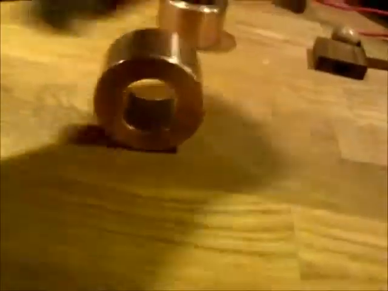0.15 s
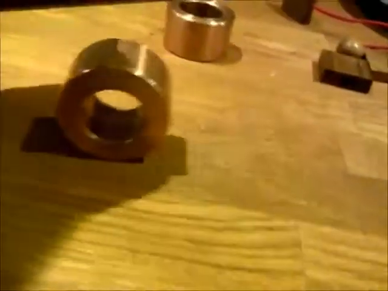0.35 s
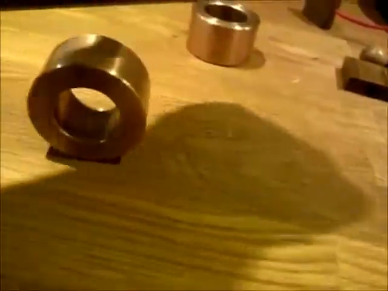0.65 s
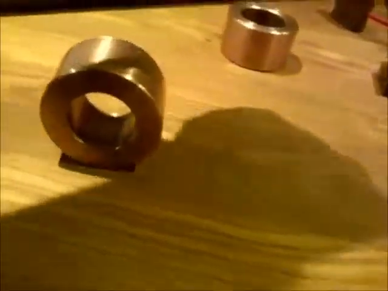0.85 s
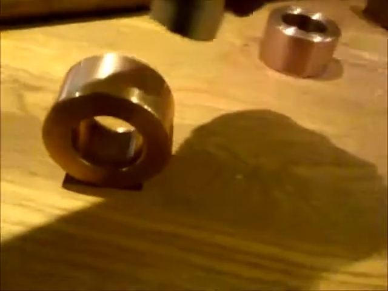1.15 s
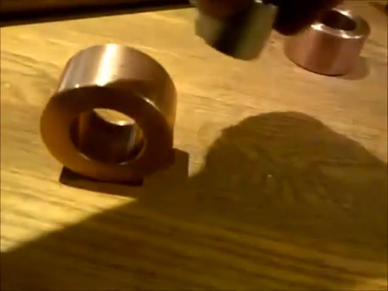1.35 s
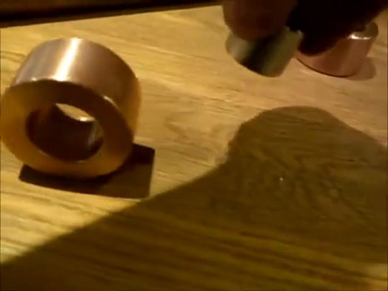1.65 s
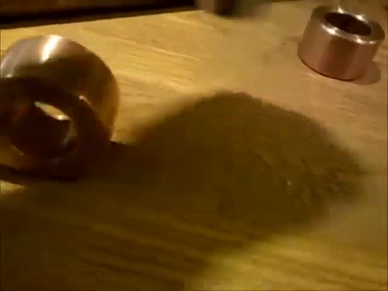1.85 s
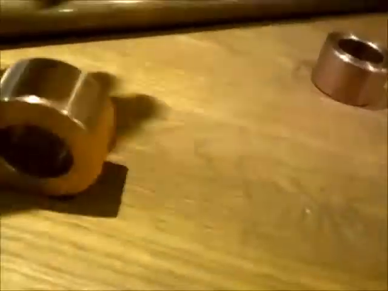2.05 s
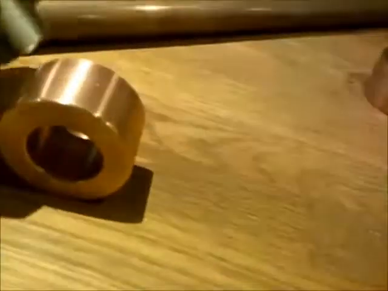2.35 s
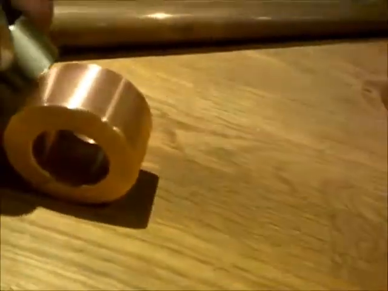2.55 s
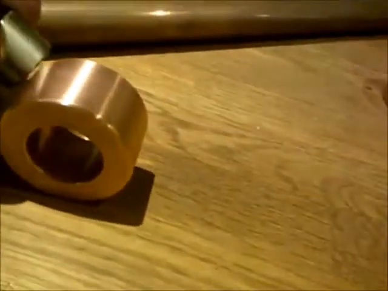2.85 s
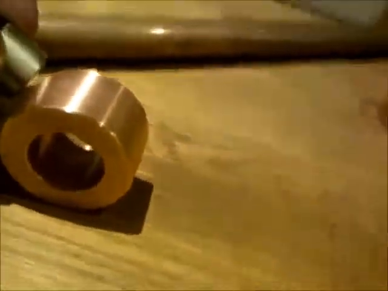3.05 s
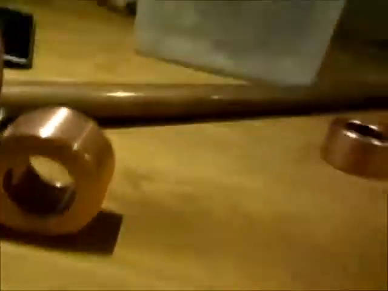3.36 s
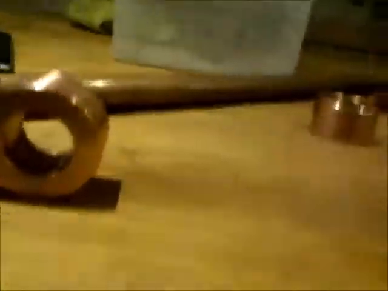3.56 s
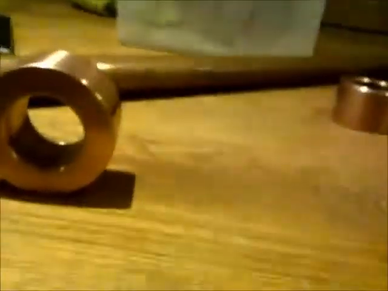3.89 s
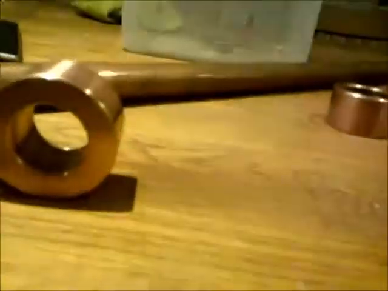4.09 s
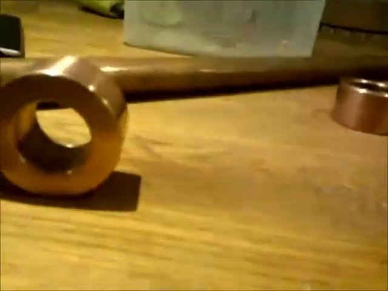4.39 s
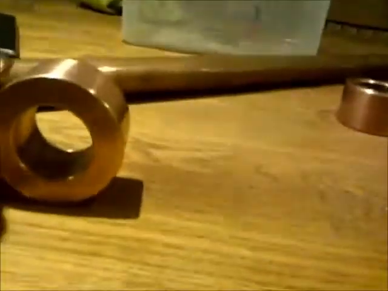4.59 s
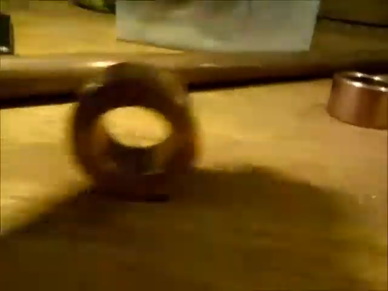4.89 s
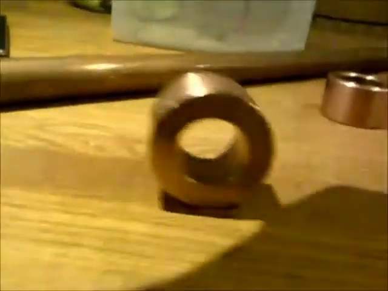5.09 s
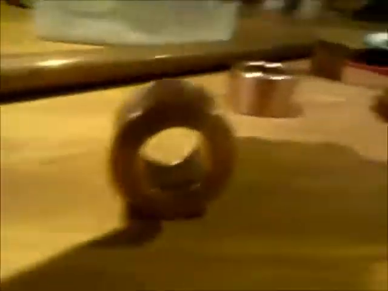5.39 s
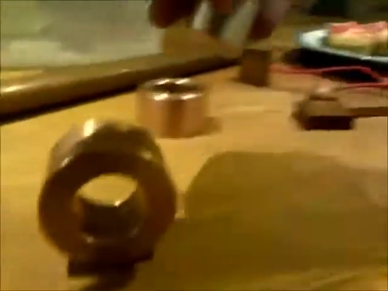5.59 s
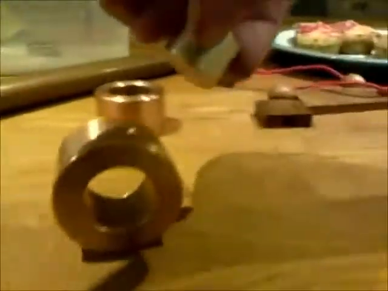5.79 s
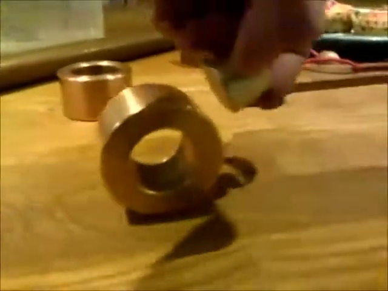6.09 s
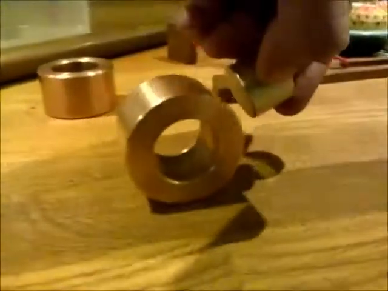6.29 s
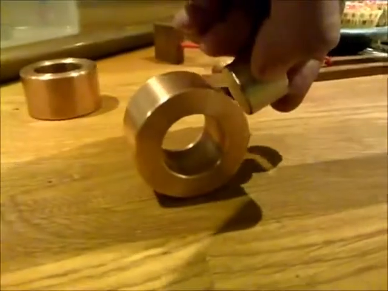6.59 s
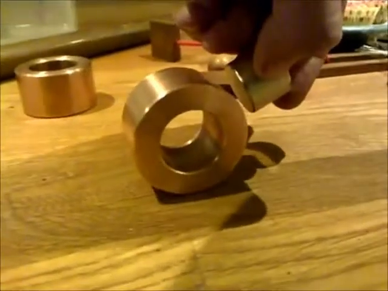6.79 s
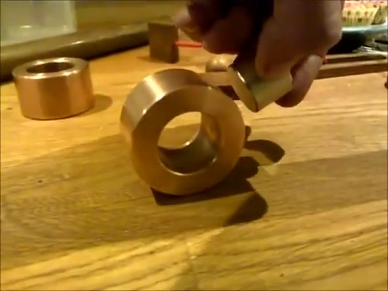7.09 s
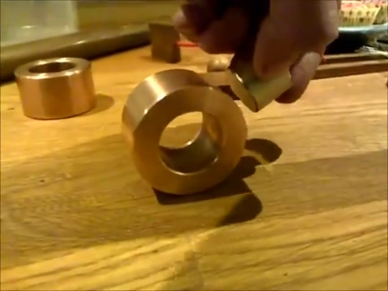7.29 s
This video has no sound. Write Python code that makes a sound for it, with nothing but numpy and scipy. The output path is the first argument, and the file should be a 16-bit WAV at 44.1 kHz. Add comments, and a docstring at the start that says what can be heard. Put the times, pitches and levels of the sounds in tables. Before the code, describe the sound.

A thick copper ring is nudged along a wooden table by a small hand-held magnet, close to the microphone in a small room with faint steady hiss. At about 0.5 seconds the ring knocks on the wood and rolls briefly. Soft bumps follow around 1.4 and 2 seconds. At 2.6 seconds the magnet clicks against the copper with a light thud. From 3 to 4.1 seconds it rubs very faintly, with a thin whistle and two tiny ticks. A sharp, loud metallic click at 4.8 seconds sets off a quick clatter of wooden knocks. The ring then rolls with a low rumble and small bumps until about 6.2 seconds, with the hardest knock at 5.7 seconds. A faint short scrape comes at 6 seconds and a last light knock at 6.4. Only hiss remains until the end, just past 7 seconds.

```python
"""In a small room, close to a camera, a hand-held magnet nudges a thick copper ring along a wooden table.
The ring bumps and rolls over the wood, and the table top answers with thuds and a low rumble.
The magnet clicks against the copper and rubs it faintly. Nearby surfaces throw each hit straight back,
the room rings briefly, and the microphone hisses underneath."""
import sys
import numpy as np
from scipy import signal
from scipy.fft import rfft, irfft, next_fast_len
from scipy.io import wavfile
from scipy.ndimage import map_coordinates

SR = 44100
rng = np.random.default_rng(int(sys.argv[2]) if len(sys.argv) > 2 else 0)


def materialize(psi):
    """Save the field psi as 16-bit PCM at rate SR to the path in sys.argv[1].

    A 1-D psi becomes a single channel; in a 2-D psi each row is a channel.
    """
    bounded = np.clip(np.atleast_2d(psi).T, -1, 1)
    quanta = np.round(bounded * 32767).astype(np.int16)
    wavfile.write(sys.argv[1], SR, quanta)


N = 328306


# tone of the noise bed: f/Hz, level/dB
HISS_SPECTRUM = [(25, -24), (120, -22), (200, -10.5), (290, -1.5), (430, 0), (700, -3.5), (1400, -6.5),
                 (3000, -8.5), (6300, -9), (7500, -12), (8600, -20.5), (9300, -29), (9900, -41)]

def hiss(rms_db=-56.5):
    """A steady bed of microphone hiss and room air."""
    return amp(rms_db) * noise(HISS_SPECTRUM)


# tone of the table top's first push: f/Hz, level/dB
THUD_SPECTRUM = [(40, -30.5), (130, -26), (190, 0.8), (330, 10.5), (470, 9), (630, 11.5), (790, 4.5),
                 (950, 3.5), (1100, -3.5), (1190, -7), (1420, -18), (1680, -15), (2400, -40), (5000, -57)]
# the table top's modes: f/Hz, level/dB, t60/s
WOOD_MODES = [(185, 4, 0.28), (219.7, 5, .27), (254, 7, 0.17), (325, -13, 0.24), (382.5, 10.5, 0.24),
              (430, 5.5, 0.38), (461, 14, 0.12), (549, -0.5, 0.35), (631, 4.5, 0.17), (655, -6, 0.13),
              (774.5, 21.5, 0.12), (907, 19, 0.09), (1101, 12, .12)]
# bands where the table's bending waves arrive late: f/Hz, width/Hz
BENDING_BANDS = [(413, 7.5), (308, 230), (818, 350), (958, 120)]
# slap from the table's edges and nearby surfaces: delay/s, gain
KNOCK_SLAPS = [(.00617, 1.39), (0.0149, 0.73), (0.081, .14)]
# the ring bumps the wood: t/s, level/dB, hardness as treble/dB, struck spot's f/Hz, ringing/dB
KNOCK_CUES = [(0.378, -45.5, -14, 465, -1), (0.411, -32, -19, 410, -5.5), (0.4992, -17.5, 7, 478, 0.5),
              (0.612, -45.5, 2, 387, 1), (1.354, -39.5, -11, 325, -3), (1.8, -47.5, -18, 325, 1),
              (1.92, -41, -17, 255, 1.5), (2.085, -31.7, -7.2, 664, -0.5), (2.5829, -30, 0.5, 630, 2),
              (4.7628, -22.5, 3, 640, 0.5), (4.788, -36, -1, 780, 3), (4.8609, -19, 0, 385, -4.5),
              (4.885, -26, 3, 255, 0), (4.901, -21, 3, 255, 1), (4.91, -29, -14, 645, -20),
              (4.9543, -18, -0.5, 653, -3.3), (4.9989, -20, 6, 396, 0.5), (5.06, -32, -11.5, 462, -1.5),
              (5.108, -41, -7, 787, -11.5), (5.1907, -28, -3, 445, 0.2), (5.269, -35.5, -9, 780, -6.5),
              (5.417, -32, -4.5, 433, -1), (5.489, -37.5, -17.5, 425, -4), (5.5796, -29, -8, 470, 1.5),
              (5.626, -24.5, -22.5, 330, -1.5), (5.6557, -11, 16.5, 418, -0.5), (5.75, -33.5, -8, 430, -2),
              (5.893, -40.5, -15, 328, -7), (5.917, -34, -11.5, 427, 0), (6.3594, -27.5, 3, 420, 1)]

def knocks():
    """Each bump pushes the table top: a thud carries into the room and the wood rings on."""
    air_db, wood_db, bus_db = 0.5, -51.5, -9
    track = np.zeros(N)
    for s, db, hardness_db, spot_hz, ringing_db in KNOCK_CUES:
        push = amp(db) * pulse(THUD_SPECTRUM, hardness_db, low_hz=248, high_hz=940)
        air = amp(air_db) * reflected(room(tail_db=-9.5, build_s=0.0067), KNOCK_SLAPS)
        wood = amp(wood_db + ringing_db) * ringing(struck_at(WOOD_MODES, spot_hz))
        add(track, s, signal.fftconvolve(push, air + wood))
    for hz, width_hz in BENDING_BANDS:
        track = dispersed(track, hz, width_hz)
    return amp(bus_db) * track


# a rolling contact is soft, so the low modes speak most: f/Hz, level/dB
ROLL_EQ = [(220, 0.5), (370, -7), (450, -1.5), (650, -10.5), (800, -16.5)]
# the ring rolls from a nudge until it slows: t/s, hold/s, level/dB
ROLL_CUES = [(0.39, 0.12, -57), (1.93, 0.21, -64), (4.86, 0.23, -52), (5.15, 0.744, -55.5),
             (6.0, 0.17, -59)]

def rolling():
    """The grain of the wood shakes the table top's modes under the rolling ring."""
    grain = noise(THUD_SPECTRUM) * flutter(depth_db=3, knots_per_s=35)
    body = signal.fftconvolve(grain, ringing(WOOD_MODES))[:N]
    rumble = filtered(body, lambda hz: amp(curve(ROLL_EQ, hz)))
    return swells(ROLL_CUES, attack_s=0.074, release_s=0.099) * unit_rms(rumble)


# tone of metal on metal: f/Hz, level/dB
CLACK_SPECTRUM = [(40, -37), (150, -25), (600, -6.5), (1400, -15), (2050, -3), (2700, -14), (3500, -4.5),
                  (4300, -0.5), (5500, 0), (7000, -4.5), (8700, -18.5), (10000, -31.5), (15000, -40.5)]
# the faint ring-out after a click: f/Hz, level/dB, t60/s
CLINK_MODES = [(1143, -38.5, 0.2), (1340, -39.5, 0.097), (2025, -38.5, 0.12), (4140, -45, 0.089),
               (4350, -42, .09), (4960, -47, 0.083), (6590, -38, 0.069)]
# slap from the table's edges and nearby surfaces: delay/s, gain
CLICK_SLAPS = [(.0011, 0.055), (.0047, .1), (.0056, .1), (.021, 0.027)]
# the magnet hits the copper: t/s, level/dB, hardness as treble/dB, rebound delay/ms, rebound gain,
# first reflection's delay/ms, struck spot's f/Hz
CLICK_CUES = [(2.5811, -18, -6, 0.67, 0.35, 3.5, 1122), (3.3839, -35.5, 1, 0.48, 0.7, 3.8, 4040),
              (4.0033, -36, 3, 0.48, 0.58, 3.9, 4040), (4.7615, -5.5, 10.5, 0.38, 0.089, 2.8, 1320),
              (5.2555, -31, 0, .48, 0.56, 3.2, 1900)]

def clicks(wall_gain=0.54):
    """Metal meets metal and rebounds within a millisecond, which colours the click; a clink rings out."""
    track = np.zeros(N)
    for s, db, hardness_db, rebound_ms, rebound_gain, wall_ms, spot_hz in CLICK_CUES:
        clack = pulse(CLACK_SPECTRUM, hardness_db, low_hz=3520, high_hz=7800)
        clack = reflected(clack, [(rebound_ms / 1000, rebound_gain)])
        clack = reflected(clack, [(wall_ms / 1000, wall_gain)])
        add(track, s, amp(db) * signal.fftconvolve(clack, room(tail_db=-18, build_s=0.0228)))
        add(track, s, amp(db) * ringing(struck_at(CLINK_MODES, spot_hz)))
    return reflected(dispersed(track, hz=5580, width_hz=820), CLICK_SLAPS)


# tone of the scrape: f/Hz, level/dB
SCRAPE_SPECTRUM = [(1000, -22.5), (1800, -8.5), (3000, -10.5), (4200, -11), (5900, -11.5), (7500, -14.5),
                   (10000, -43)]
# glide of the scrape's whistle: t/s, f/Hz
WHISTLE_GLIDE = [(3.05, 5200), (3.15, 4950), (3.26, 4830), (3.38, 4230), (3.899, 4440), (4.12, 4650),
                 (6.05, 5000)]
# the magnet rubs the copper: t/s, hold/s, level/dB, whistle against scrape/dB
RUB_CUES = [(3.037, 0.027, -59.5, -15), (3.14, 0.15, -67, 0), (3.7, 0.418, -65.5, -8),
            (6.04, 0.036, -60, -25)]

def rubbing(whistle_width_hz=560):
    """A faint, uneven scrape with a thin whistle that glides as the magnet slides over the ring."""
    pitch_hz = np.interp(np.arange(N) / SR, *np.transpose(WHISTLE_GLIDE))
    narrow_noise = filtered(rng.standard_normal(N), lambda hz: np.exp(-(2 * hz / whistle_width_hz) ** 2))
    whistle = unit_rms(narrow_noise * np.cos(2 * np.pi * np.cumsum(pitch_hz) / SR))
    scrape = noise(SCRAPE_SPECTRUM)
    track = np.zeros(N)
    for s, hold_s, db, whistle_db in RUB_CUES:
        envelope = swells([(s, hold_s, db)], attack_s=0.019, release_s=0.042)
        track += envelope * unit_rms(scrape + amp(whistle_db) * whistle)
    return flutter(depth_db=3.1, knots_per_s=25) * track


# the small room's decay: f/Hz, t60/s
ROOM_DECAY = [(200, 0.28), (500, 0.32), (900, 0.34), (1700, 0.336), (5000, 0.1), (10000, 0.097)]

def room(tail_db, build_s):
    """The direct path plus a fresh diffuse tail that builds up, then dies fastest in the treble."""
    length = SR // 2
    hz, t, bands = signal.stft(rng.standard_normal(length), SR, nperseg=256)
    decay = amp(-60 * t / curve(ROOM_DECAY, hz)[:, None])
    tail = signal.istft(bands * decay, SR, nperseg=256)[1][:length]
    tail *= 1 - np.exp(-(np.arange(length) / SR / build_s) ** 2)
    return signal.unit_impulse(length) + amp(tail_db) * tail / np.linalg.norm(tail)


def pulse(spectrum, hardness_db, low_hz, high_hz, size=4096):
    """A transient of peak 1; hardness shelves its treble up or down, sloping from low_hz to high_hz."""
    hz = np.fft.rfftfreq(size, 1 / SR)
    shelf_db = curve([(low_hz, 0), (high_hz, hardness_db)], hz)
    cepstrum = irfft(np.log(amp(curve(spectrum, hz) + shelf_db)))
    # minimum phase packs the energy into the attack
    folded = cepstrum[:size // 2] * np.r_[1, np.full(size // 2 - 1, 2)]
    push = irfft(np.exp(rfft(folded, size)))
    return push / np.abs(push).max()


def reflected(x, echoes):
    """x with delayed copies, which comb its spectrum."""
    return x + sum(gain * np.pad(x, (round(delay_s * SR), 0))[:len(x)] for delay_s, gain in echoes)


def struck_at(modes, spot_hz, lift_db=8, width_octaves=0.092):
    """The struck spot lifts the modes near one pitch."""
    return [(hz, db + lift_db * np.exp(-(np.log2(hz / spot_hz) / width_octaves) ** 2), t60)
            for hz, db, t60 in modes]


def ringing(modes):
    """Decaying modes; their strengths change by about 1 dB from hit to hit."""
    t = np.arange(SR // 2) / SR
    hz, db, t60 = np.transpose(modes)[:, :, None]
    gain = amp(db + rng.standard_normal(db.shape))
    decay = np.exp(-np.log(1000) * t / t60)
    return np.sum(gain * decay * np.cos(2 * np.pi * hz * t), axis=0)


def dispersed(x, hz, width_hz):
    """An all-pass: energy near hz arrives late, which smears the attack."""
    return x - 2 * signal.lfilter(*signal.iirpeak(hz, hz / width_hz, fs=SR), x)


def swells(cues, attack_s, release_s):
    """An envelope: each cue swells up to its start time, holds and dies away."""
    t = np.arange(N) / SR
    start_s, hold_s, db = np.transpose(cues)[:, :, None]
    fade_in = np.maximum(start_s - t, 0) / attack_s
    fade_out = np.maximum(t - start_s - hold_s, 0) / release_s
    return np.max(amp(db) * np.exp(-fade_in - fade_out), axis=0)


def flutter(depth_db, knots_per_s):
    """A gain that wanders smoothly at random."""
    knots = rng.standard_normal(int(N * knots_per_s / SR) + 4)
    return amp(depth_db * map_coordinates(knots, [np.arange(N) * knots_per_s / SR]))


def noise(spectrum):
    """Coloured noise of rms 1."""
    return unit_rms(filtered(rng.standard_normal(N), lambda hz: amp(curve(spectrum, hz))))


def filtered(x, response):
    """x through a zero-phase EQ of gain response(hz)."""
    size = next_fast_len(len(x) + SR // 2)
    return irfft(rfft(x, size) * response(np.fft.rfftfreq(size, 1 / SR)), size)[:len(x)]


def curve(points, hz):
    """Breakpoints read on a log frequency axis."""
    point_hz, values = np.transpose(points)
    return np.interp(np.log(hz + 1), np.log(point_hz + 1), values)


def amp(db):
    """Decibels to gain."""
    return 10 ** (np.asarray(db) / 20)


def unit_rms(x):
    """x at rms 1."""
    return x / np.sqrt(np.mean(x ** 2) + 1e-20)


def add(track, s, sound):
    """Mix a sound into the track at time s."""
    start = round(s * SR)
    track[start:start + len(sound)] += sound[:N - start]


def scene():
    """Wood, metal and hiss in one mono mix."""
    return (knocks() + clicks() + rolling() + rubbing() + hiss())[None]


def record(dry):
    """The camera has a narrow dip at 8 kHz and lets only a trace through above its band limit."""
    dipped = signal.lfilter(*signal.iirnotch(8000, Q=18, fs=SR), dry)
    main_band = signal.sosfilt(signal.butter(10, 9825, fs=SR, output="sos"), dipped)
    wide_band = signal.sosfilt(signal.butter(10, 15500, fs=SR, output="sos"), dipped)
    return main_band + amp(-22) * wide_band


dry = scene()
out = record(dry)
materialize(out)
```